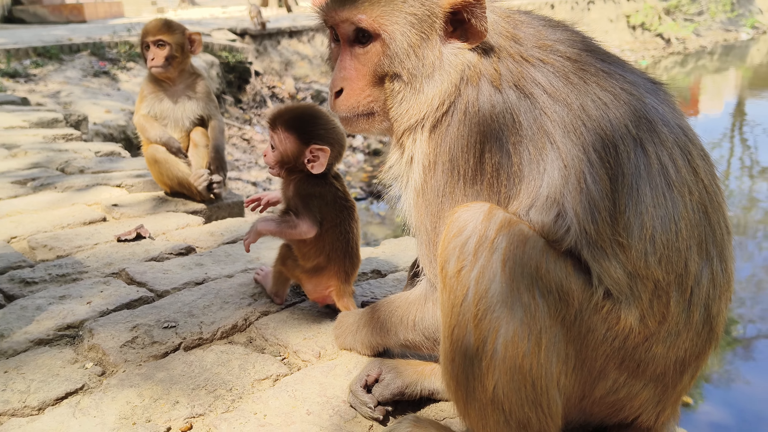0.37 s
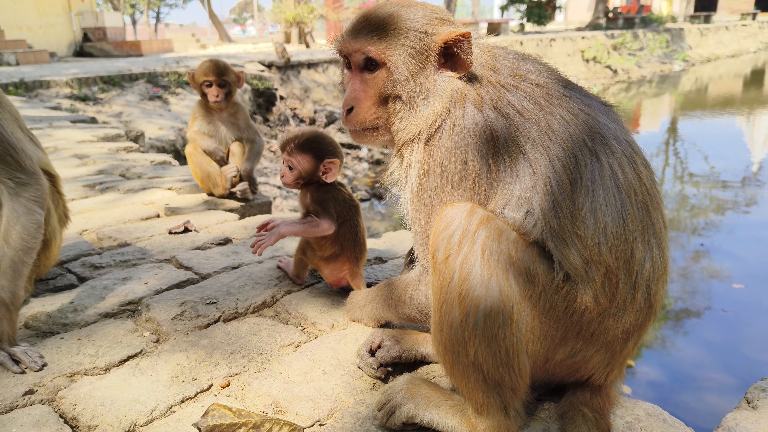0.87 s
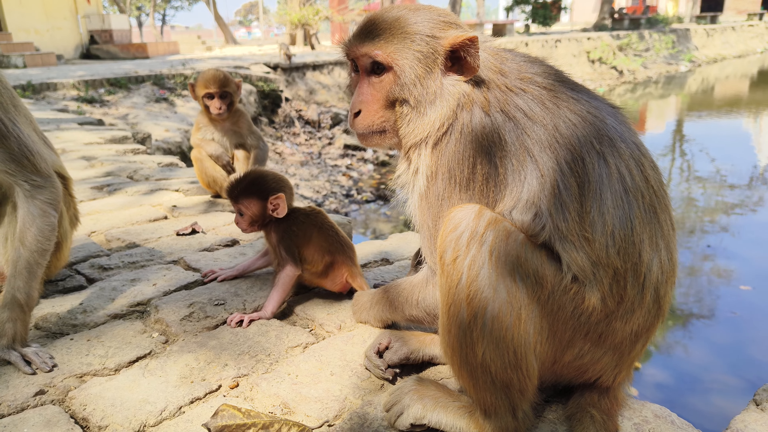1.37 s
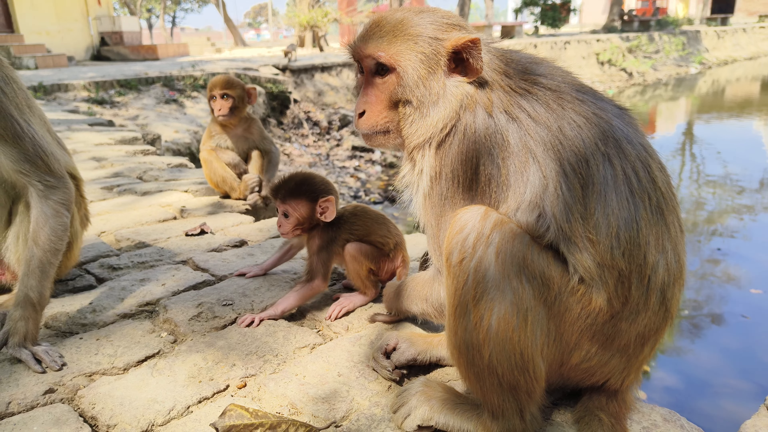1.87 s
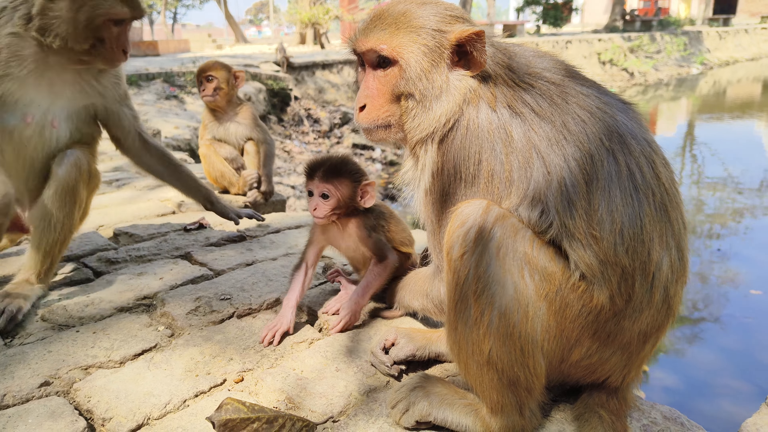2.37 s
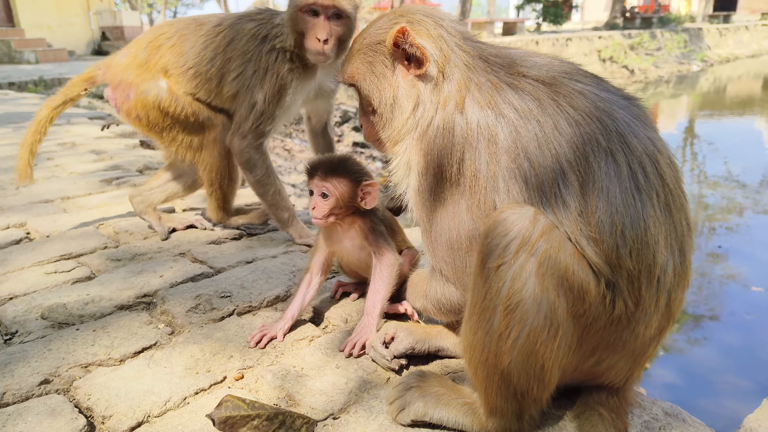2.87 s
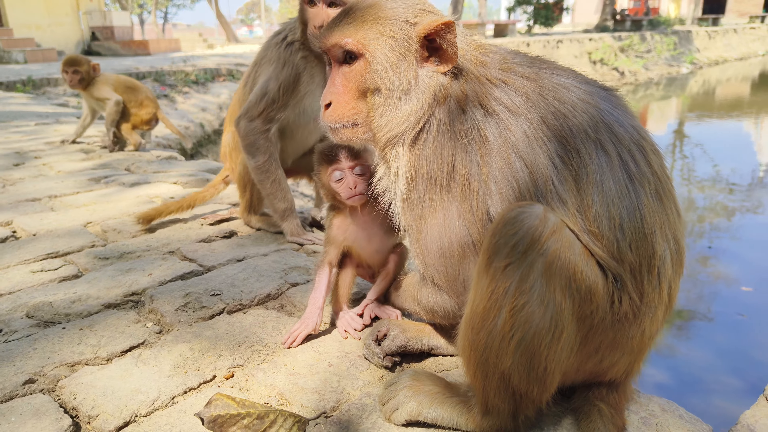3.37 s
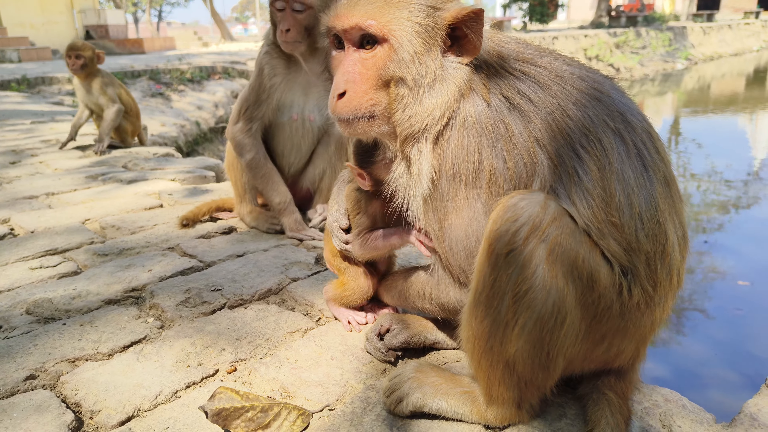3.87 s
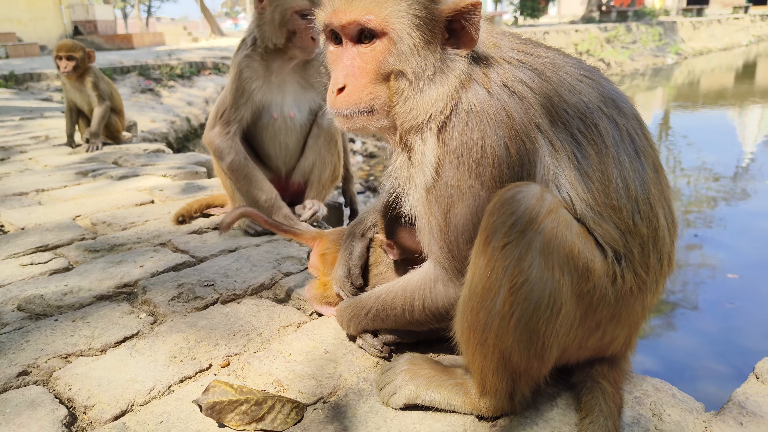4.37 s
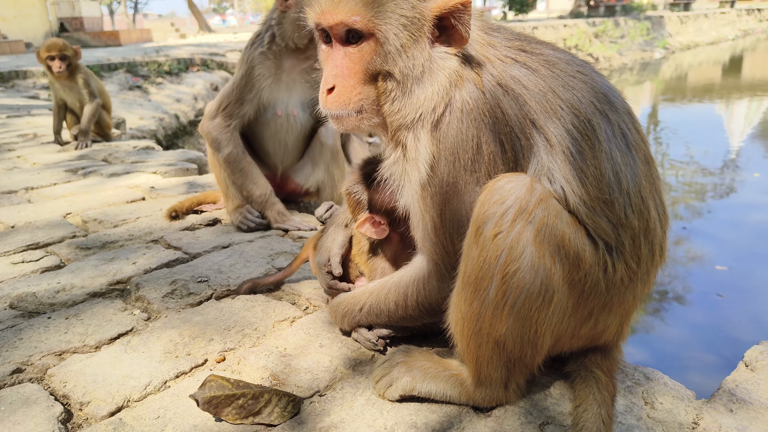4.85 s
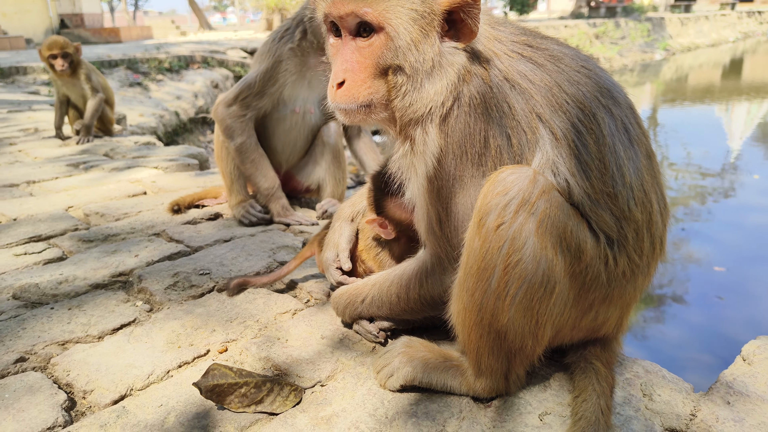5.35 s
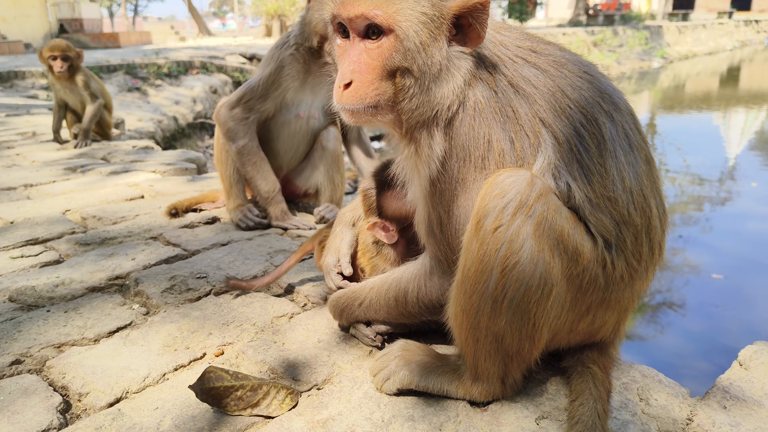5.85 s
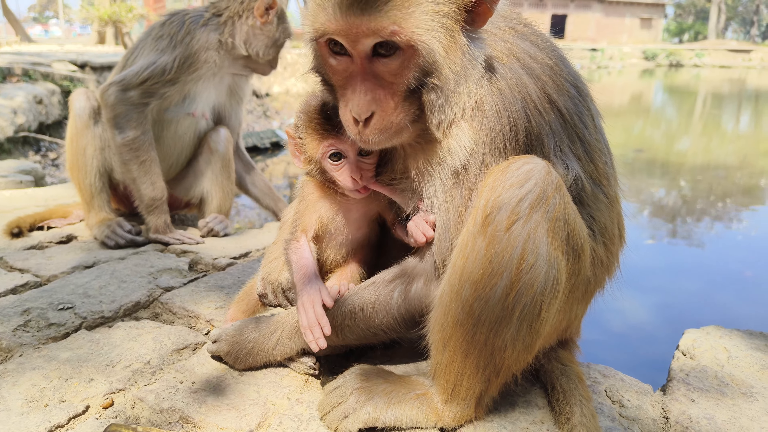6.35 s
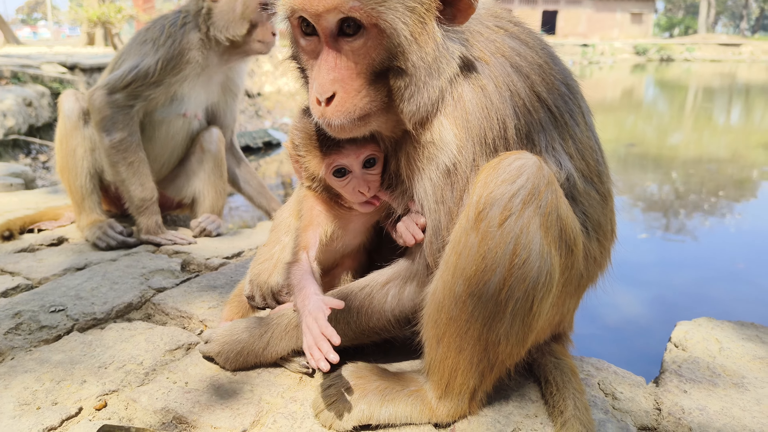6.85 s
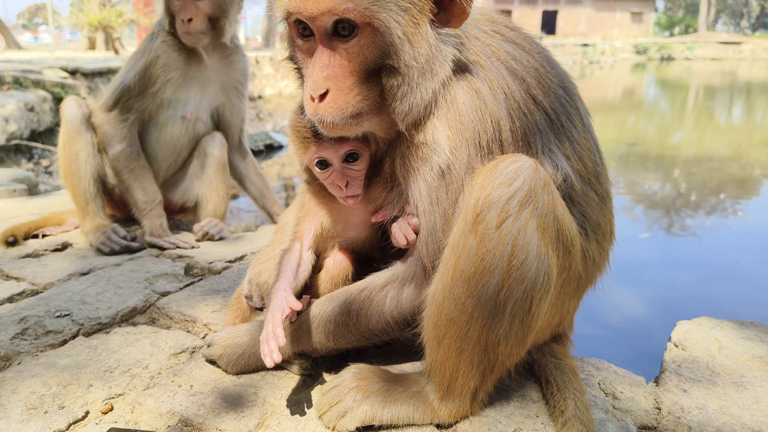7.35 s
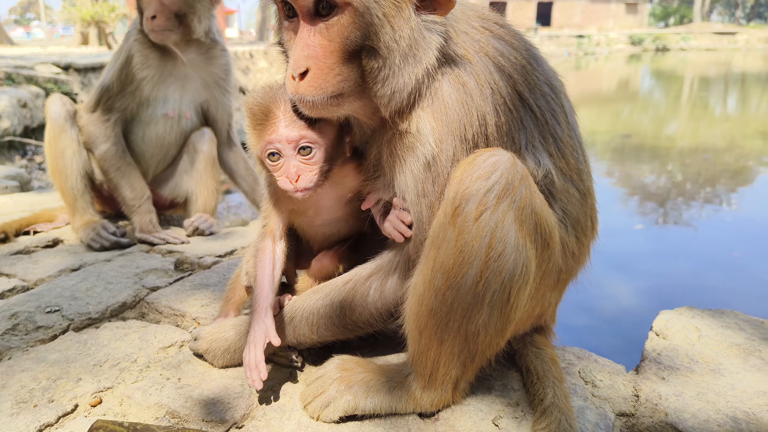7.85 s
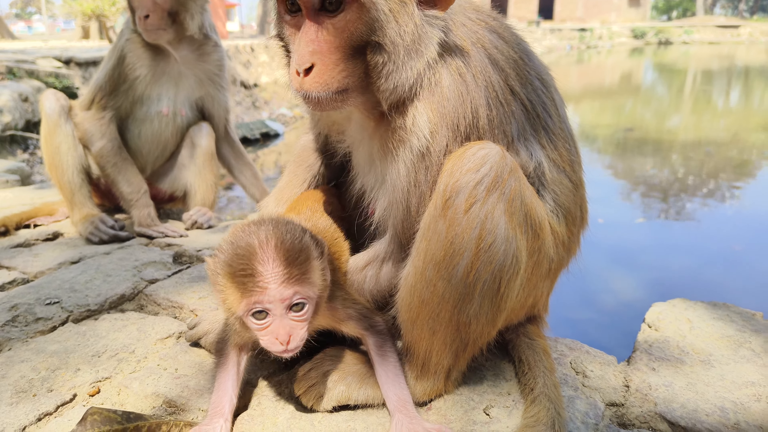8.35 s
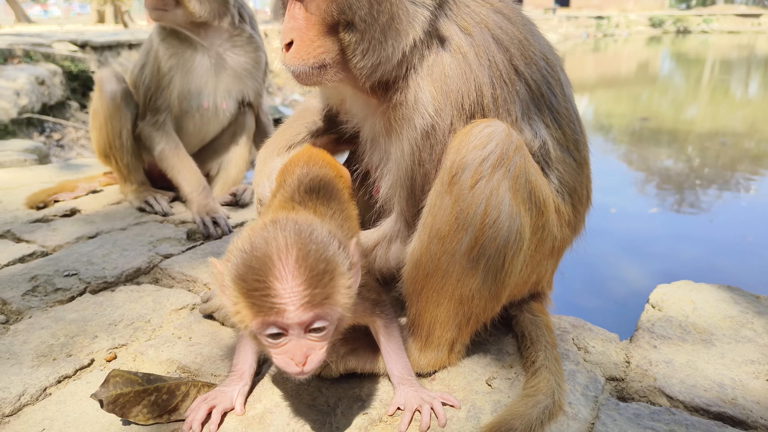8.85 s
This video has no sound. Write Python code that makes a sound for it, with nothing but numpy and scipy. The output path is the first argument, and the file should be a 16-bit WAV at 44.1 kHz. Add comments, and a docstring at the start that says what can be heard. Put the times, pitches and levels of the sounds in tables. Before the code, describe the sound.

Open air on a stone pond bank, macaques close to a two-port phone microphone, with a low uneven engine hum far off and faint hiss. From 0 to 2 s feet and fur scuff over gritty stone, with small knocks, while an infant gives a soft rising coo at about 0.5-1.1 s. Wind buffets the left side around 2.4-2.8 s; a leaf crackles and grit snaps at 2.7 s, then a sharper scuffle with snaps at 3.2 s. Short barks and a peep come at 3.6-3.8 s, with faint coos, whistles and chirps to 4.8 s. A rapid chirp cluster sounds at 5 s, a yap at 5.25 s and faint distant hoots. Two harsh, rasping squeals follow at 5.9-6.4 s and 6.7-7 s. Squeaks come at 7.3 s, warbles at 7.8 s, and a burst of squeaks with a strong wind thump near 8 s. Crisp snaps at 8.3 s and scuffs near 9 s finish it.

```python
"""Macaques by a pond

Macaques on a stone bank, a metre or two from a phone with two microphone ports. Infants squeal and coo
near and far, as stacks of gliding partials; the two long squeals also rasp with choking bands of noise.
Feet, fur and dry leaves are grains of noise; ticks and knocks are damped rings with a crack of noise.
Wind buffets the left port as low noise and slow eddies, over a low town rumble and a faint open-air hiss."""
import sys
import numpy as np
from scipy import signal
from scipy.fft import rfft, irfft
from scipy.io import wavfile
from scipy.ndimage import uniform_filter1d

SR = 44100
rng = np.random.default_rng(int(sys.argv[2]) if len(sys.argv) > 2 else 0)


def how_loud(loudness_db):
    """Turn decibels into a plain amplitude multiplier (0 dB gives 1, 20 dB gives 10)."""
    steps = np.asarray(loudness_db, float) / 20
    return 10 ** steps


def wav_out(sig):
    """Save sig, one row per channel (or a flat mono array), as 16-bit PCM at SR to the path in sys.argv[1]."""
    wavfile.write(sys.argv[1], SR, np.round(np.clip(np.atleast_2d(sig).T, -1, 1) * 32767).astype(np.int16))


N = 406602
T = np.arange(N) / SR
PORT_LAG_S = .00043  # the left port faces most sources
SWELL_POWER = 1.96  # 1 = pointed crest, 2 = round crest
SWELL_ENDS_DB = 27  # a scuff or rustle is this far down after its rise or fall time


def colour(x, points, lo_hz, hi_hz):
    """Shape to a spectrum joined on a log axis; rms 1 between lo and hi."""
    f = np.fft.rfftfreq(x.shape[-1], 1 / SR) + 1
    hz, db = np.transpose(points)
    spec = rfft(x) * how_loud(np.interp(np.log(f), np.log(hz), db))
    inside = (f > lo_hz) & (f < hi_hz)
    power = 2 * np.sum(np.abs(spec[..., inside]) ** 2) / x.shape[-1] / x.size
    return irfft(spec, x.shape[-1]) / np.sqrt(power)


def band(x, lo_hz, hi_hz):
    """Band-pass."""
    edges_hz = [lo_hz, min(hi_hz, .45 * SR)]
    return signal.sosfilt(signal.butter(2, edges_hz, "bandpass", fs=SR, output="sos"), x)


def walk(rate, size=N):
    """Smooth random wander, spread 1; a higher rate wanders faster."""
    k = max(int(SR / rate), 2)
    steps = rng.standard_normal(size + 2 * k)
    smooth = uniform_filter1d(uniform_filter1d(steps, k), k)
    return smooth[k:-k] * np.sqrt(1.5 * k)


def ports(shared, alike, lag_s=PORT_LAG_S, grain=1):
    """Two-port noise: a shared part that reaches the right port late, plus each port's own part."""
    alike = np.clip(alike, 0, 1)
    both = np.array([shared * grain, np.roll(shared * grain, int(lag_s * SR))])
    own = grain * rng.standard_normal((2, N))
    return np.sqrt(alike) * both + np.sqrt(1 - alike) * own


def pan(db):
    """Left and right gains for a left minus right difference in dB."""
    return how_loud(np.array([db / 2, -db / 2]))


def curve(tables, column, rest):
    """One column of several spans over time, resting between them."""
    out = np.full(N, float(rest))
    for rows in map(np.array, tables):
        on = (T >= rows[0, 0]) & (T <= rows[-1, 0])
        out[on] = np.interp(T[on], rows[:, 0], rows[:, column])
    return out


def swell(t, crest_s, rise_s, fall_s):
    """Rounded distance from the crest: 0 there, 1 after the rise or fall time; times dB, an envelope."""
    side_s = np.where(t < crest_s, max(rise_s, 1e-3), max(fall_s, 1e-3))
    return np.abs((t - crest_s) / side_s) ** SWELL_POWER


def swells(table, rest_db):
    """Level in dB of a table of swells together over a faint rest level."""
    power = how_loud(2 * rest_db)
    for crest_s, db, rise_s, fall_s in table:
        power = power + how_loud(2 * (db - SWELL_ENDS_DB * swell(T, crest_s, rise_s, fall_s)))
    return 10 * np.log10(power)


def blows(table, ring_cycles, crack_db, crack_s, spread):
    """Each blow: a damped ring and a short crack of noise around the ring's pitch."""
    out, t = np.zeros((2, N)), T[:4000]
    for s, db, hz, pan_db in table:
        ring = np.sin(2 * np.pi * hz * t) * np.exp(-t * hz / ring_cycles) * (1 - np.exp(-t * hz))
        crack = band(rng.standard_normal((2, len(t))), hz / spread, hz * spread)
        crack = crack * how_loud(crack_db) * np.exp(-t / crack_s)
        hit = (ring + crack) * how_loud(db) * pan(pan_db)[:, None]
        for side, lag in enumerate((0, int(.5 * PORT_LAG_S * SR))):
            a = int(s * SR) + lag
            out[side, a:a + len(t)] += hit[side, :N - a]
    return out


# wind on the left port, before its flutter: (t/s, level/dB around 40 Hz)
WIND_GUSTS = [(0.0, -72), (0.37, -87), (1.74, -75.5), (2.0, -62.5), (2.434, -53), (3.2, -66.5),
              (4.6, -76.5), (4.73, -59.5), (5.2, -73), (6.9, -77), (7.102, -67.5), (7.9, -58.5),
              (7.99, -46), (8.06, -64.5), (9.22, -66.5)]
# spectrum of the wind: (f/Hz, relative level/dB per Hz)
WIND_SPECTRUM = [(12, -22), (20, -10.5), (54, 9), (81, 7.5), (186, -19.5), (300, -36), (390, -32.5),
                 (660, -120)]
# single eddies slapping the left port, cresting 1.5 cycles after t: (t/s, strength/dB, f/Hz)
EDDIES = [(2.354, -22, 83.6), (2.599, -25, 59.6), (2.729, -33.5, 58.5), (2.803, -28.5, 101.5),
          (3.48, -38.5, 62.7), (3.625, -46, 79), (4.697, -37.5, 65), (4.745, -35, 60), (4.83, -41, 60.7),
          (7.133, -28, 61.7), (7.51, -25.5, 67.9), (7.948, -22.5, 105.7), (8.409, -33.5, 72),
          (8.882, -29, 57), (8.88, -27, 76)]


def wind():
    """Gusty low pressure, mostly on the left port, with single eddies as a few slow, lopsided cycles."""
    noise = colour(rng.standard_normal((2, N)), WIND_SPECTRUM, 35.1, 45.4)
    gust_db = np.interp(T, *np.transpose(WIND_GUSTS)) + 2.0 * walk(42)
    out = noise * how_loud(gust_db) * np.array([[1], [how_loud(-15.5)]])
    for s, db, hz in EDDIES:
        cycles = (T - s) * hz - 1.5
        overtone = 0.24 * np.cos(4.4 * np.pi * cycles) * np.exp(-(cycles / 1.0) ** 2)
        swing = np.cos(2 * np.pi * cycles) + overtone
        out += how_loud(db) * np.exp(-(cycles / .85) ** 2) * swing * np.array([[1], [how_loud(-36)]])
    return out


# resonances of far engines, before the lean to the left: (f/Hz, width/Hz, level/dB)
ENGINE_HUMS = [(72.2, 26.4, -61), (112.4, 13, -69.5)]


def town():
    """Far engines as narrow bands of noise: a low hum that throbs unevenly, nearly alike at both ports."""
    out = 0
    for hz, width_hz, db in ENGINE_HUMS:
        hum = band(ports(rng.standard_normal(N), 1.0), hz - width_hz / 2, hz + width_hz / 2)
        out = out + hum / hum.std() * how_loud(db)
    return out * pan(2.3)[:, None]


# spectrum of the open air: (f/Hz, relative level/dB per Hz)
AIR_SPECTRUM = [(120, -46), (200, -8.5), (456, -11), (601, 9), (1160, -33), (1300, 1.5), (2470, 9.5),
                (6880, 9), (8420, -5), (11500, -42), (15100, -16), (16000, -20)]
AIR_DB = -53.5  # 1-16 kHz, before the split into bands


def air():
    """Distant hiss in octave bands that each waver a little."""
    noise = colour(ports(rng.standard_normal(N), 0.34), AIR_SPECTRUM, 1000, 16000)
    lows_hz = 150 * 2. ** np.arange(7)
    return how_loud(AIR_DB) * sum(band(noise, lo, 2 * lo) * how_loud(1.1 * walk(9)) for lo in lows_hz)


# feet and fur dragged over stone close by: (loudest at t/s, treble level/dB, rise/s, fall/s)
DRAGS = [(.38, -50.5, 0.1, 0.052), (.52, -44.5, 0.22, 0.48), (.82, -62.5, 0.1, 0.36),
         (1.063, -56, 0.035, 0.048), (1.217, -58.5, 0.1, 0.07), (1.42, -50, 0.11, 0.17),
         (1.665, -49, 0.081, 0.053), (1.77, -60.5, 0.052, 0.16), (2.05, -50.5, 0.17, 0.2),
         (2.479, -59, 0.069, 0.15), (3.06, -62.5, 0.012, 0.29), (3.217, -42, 0.037, 0.034),
         (3.4, -59, 0.013, 0.16), (3.617, -55.5, 0.1, 0.18), (3.81, -60, .05, 0.16),
         (4.086, -58.5, 0.034, 0.084), (4.22, -60, 0.12, 0.26), (4.81, -53.5, 0.03, 0.042),
         (4.988, -52.5, 0.018, 0.12), (5.27, -53, 0.058, 0.063), (5.612, -53.5, 0.19, 0.25),
         (7.821, -54, 0.22, 0.28), (7.927, -57, 0.044, 0.032), (8.071, -59, 0.19, 0.096),
         (8.216, -54, 0.015, 0.025), (8.314, -43, 0.012, 0.044), (8.87, -49, 0.16, 0.17),
         (9.022, -44, 0.019, 0.044), (9.189, -51, 0.017, 0.021)]
SHUFFLE_DB = -67.5  # the faint shuffle between drags


def drag_level():
    """Level in dB of everything dragged over the stone, as rounded swells over a faint shuffle."""
    return swells(DRAGS, SHUFFLE_DB)


# spectrum of feet and fur on stone: (f/Hz, relative level/dB per Hz)
SCUFF_SPECTRUM = [(210, -29), (350, -21), (959, -12), (1090, -11.5), (2310, 0.5), (3500, -3), (5140, 2),
                  (8440, -3), (13600, -13.5), (16000, -7.5)]


def scuffs(db):
    """Dense grit grains of uneven size; a long drag fills out below, a quick slip is crisp on top."""
    size_db = np.minimum(14.0 * rng.exponential(1, N), 12)
    grain = how_loud(size_db) * (rng.random(N) < .15)
    noise = colour(ports(rng.standard_normal(N), 0.27, grain=grain), SCUFF_SPECTRUM, 6200, 19700)
    slip_db = db - uniform_filter1d(db, 8000)  # how far the level stands above its own slow average
    body, top = band(noise, 300, 3000), band(noise, 9000, 19000)
    tilt = (how_loud(-.3 * slip_db) - 1) * body + (how_loud(0.034 * slip_db) - 1) * top
    return (noise + tilt) * how_loud(db)


def crackle(db):
    """Stray grains of grit and dry leaf tick in the treble, more often while something is dragged."""
    busy = uniform_filter1d(how_loud(db / 2), 4000)
    chance = rng.random((2, N))
    struck = chance[0] < 30 / SR * busy / busy.mean()  # 30 a second on average
    hits = struck * how_loud(-56 + 12 * chance[1] ** 2)
    bursts = signal.lfilter([1], [1, -.97], hits) * rng.standard_normal((2, N))
    return band(bursts, 3200, 16500)


# grit and twigs snapping near the microphone: (t/s, strength/dB, ring f/Hz, left minus right level/dB)
SNAPS = [(0.1486, -39, 2740, 11), (0.756, -42, 1950, 20), (0.826, -36.5, 1990, 11), (1.0575, -46, 7840, 22),
         (1.7915, -48, 6600, 12), (2.6907, -26, 1970, 4), (2.6907, -30.5, 4550, 17.5),
         (2.743, -44, 7000, 12), (2.793, -36.5, 6000, 7), (2.825, -45, 5900, -6), (2.864, -42, 5200, -3),
         (3.0451, -37, 7350, -5), (3.088, -32.5, 4660, -6), (3.176, -35, 4970, 3), (3.2075, -24, 5280, -3),
         (3.2113, -23, 5260, 11), (3.224, -22, 5760, 0), (3.458, -30.5, 5020, 6), (3.4688, -42, 3920, -7),
         (3.538, -37.5, 5360, 2), (4.858, -40, 3000, 0), (4.6946, -30.5, 7560, 6), (6.746, -37, 2680, 5.5),
         (7.913, -37.5, 6700, 27), (8.3105, -26, 4860, 1), (8.3128, -19, 5140, 0), (8.3205, -23.5, 4270, 2),
         (9.0227, -32, 4690, 17.5), (9.1845, -44.5, 6800, 23)]


def ticks():
    """Grit and twigs snap: a high ring of several cycles with a brief, quieter crack."""
    return blows(SNAPS, ring_cycles=9, crack_db=-6, crack_s=.0022, spread=3.5)


# pebbles and paws knocking on the bank: (t/s, strength/dB, ring f/Hz, left minus right level/dB)
STONE_KNOCKS = [(0.2274, -57, 2700, 17), (0.375, -45.5, 487, 10), (.616, -48, 1040, 10),
                (1.0799, -47.5, 1710, 2), (3.826, -55, 270, 7), (4.061, -40.5, 532, 8),
                (4.548, -49, 820, 11), (4.6458, -47, 2170, -4), (5.14, -48.5, 142, -15),
                (6.57, -47, 175, 1), (6.635, -53.5, 488.3, -3), (7.34, -54, 640, -13),
                (7.999, -54.5, 295, 11)]


def knocks():
    """Pebbles and paws knock: a quickly damped ring under a longer, stronger crack."""
    return blows(STONE_KNOCKS, ring_cycles=4, crack_db=5, crack_s=.006, spread=2.2)


ARCH_POWER = .65  # under 1 = quick rise, long plateau, quick drop


def note(start_s, length_s, from_hz, to_hz, db, order, rough, fall_db, arch, crest, ends_db):
    """A stack of partials that glides and arches; roughness shakes pitch and loudness till lines smear."""
    n, k, rough, crest = int(length_s * SR), order, np.clip(rough, 0, 1), np.clip(crest, 0, 1)
    u = np.arange(n) / n
    glide_hz = from_hz * (to_hz / from_hz) ** u
    hz = glide_hz * (1 + arch * length_s * np.sin(np.pi * u) ** ARCH_POWER)
    # the vocal folds waver slowly and jitter quickly
    slow = walk(36.3, size=n)
    waver = 1 + rough * (0.032 * (slow - slow.mean()) + 0.0576 * walk(254, size=n))
    phase = 2 * np.pi * np.cumsum(hz / k * waver) / SR
    call = 0
    for j in range(1, int(15500 * k / hz.max()) + 1):
        flutter = 1.0 * walk(500, size=n) + rough * 0.053 * walk(2500, size=n)
        shake = np.sqrt(1 - rough) + np.sqrt(rough) * flutter
        # partials above both the loudest one and 5 kHz lose a further 4.2 dB per kHz
        above_khz = max(j * hz.min() / k / 1000 - max(hz.min() / 1000, 5), 0)
        throat_db = -abs(fall_db * (j - k)) - 4.2 * above_khz
        call = call + how_loud(throat_db) * shake * np.sin(j * phase)
    broken_db = 3 * rough * walk(70, size=n)
    effort_db = db - ends_db * swell(u, crest, crest, 1 - crest)
    return call * np.sqrt(2) * how_loud(effort_db + broken_db) * signal.windows.tukey(n, min(1, 200 / n))


STONES_DB, STONES_T60_S = -4, .028  # scatter off nearby stones and bodies, and its decay by 60 dB
STONES_HZ = 2500  # notes below this scatter less


def scatter(call, hz):
    """The direct sound plus a quick spray of reflections, unlike at each port, weaker for low notes."""
    t = T[:int(STONES_T60_S * SR)]
    paths = rng.standard_normal((2, len(t))) * how_loud(-60 * t / STONES_T60_S)
    spray = how_loud(STONES_DB) * min(hz / STONES_HZ, 1) ** 2
    paths *= spray / np.linalg.norm(paths, axis=1, keepdims=True)
    paths[:, 0] = 1
    heard = signal.fftconvolve(call[None], paths)
    return heard * np.linalg.norm(call) / np.linalg.norm(heard, axis=1, keepdims=True)


# kinds of call, by name: order of the loudest partial, roughness 0-1, fall level/dB per partial away
# from it, echo level/dB, pitch arch (share per s of length), crest (share of the note at which it is
# loudest), ends level/dB down
CALL_KINDS = dict( coo=dict(order=1, rough=.03, fall_db=32, echo_db=-28, arch=.25, crest=.68, ends_db=13),
              far_coo=dict(order=1, rough=.08, fall_db=30, echo_db=-15, arch=.2, crest=.72, ends_db=14),
              hoot=dict(order=1, rough=.2, fall_db=25, echo_db=-15, arch=.02, crest=.45, ends_db=9),
              peep=dict(order=1, rough=.16, fall_db=4, echo_db=-9, arch=.05, crest=.3, ends_db=14),
              squeak=dict(order=2, rough=.17, fall_db=3, echo_db=-17, arch=-.3, crest=.2, ends_db=12),
              chirp=dict(order=1, rough=.3, fall_db=30, echo_db=-11, arch=.05, crest=.3, ends_db=14),
              bark=dict(order=1, rough=.55, fall_db=14, echo_db=-14, arch=.05, crest=.25, ends_db=12),
              yap=dict(order=1, rough=.55, fall_db=10, echo_db=-24, arch=-.05, crest=.45, ends_db=12),
              squeal=dict(order=4, rough=.35, fall_db=4.8, echo_db=-22, arch=-.15, crest=.3, ends_db=9),
              screech=dict(order=3, rough=.3, fall_db=20, echo_db=-24, arch=.05, crest=.55, ends_db=14),
              twitter=dict(order=5, rough=.15, fall_db=4.9, echo_db=-8, arch=.1, crest=.45, ends_db=10),
              swoop=dict(order=1, rough=.32, fall_db=4, echo_db=-15, arch=-.7, crest=.5, ends_db=6),
              warble=dict(order=1, rough=.3, fall_db=15, echo_db=-14, arch=.1, crest=.7, ends_db=9),
              whistle=dict(order=1, rough=.14, fall_db=30, echo_db=-10, arch=0, crest=.15, ends_db=14))
# notes of each kind, level before panning:
# (start t/s, length/s, loudest partial's f/Hz at start, f/Hz at end, level/dB)
CALLS = dict( coo=[(.47, .605, 857, 925, -52.5)], far_coo=[(3.585, 0.31, 964, 1035, -61.5),
         (4.23, 0.317, 955, 1140, -60)], hoot=[(5.07, .13, 640.3, 628, -72.5), (5.28, .22, 642, 636, -76.5),
         (5.55, 0.38, 644.5, 614, -72), (5.7, 0.15, 1110, 1093, -65)],
         peep=[(3.755, 0.14, 2397, 2420, -53)], squeak=[(7.32, 0.062, 5080, 4510, -48.5)],
         chirp=[(4.295, 0.076, 2120, 2090, -53), (4.338, 0.017, 2470, 2520, -45),
         (4.977, 0.011, 3120, 3200, -39.5), (4.99, 0.018, 3110, 3120, -38), (5.002, 0.014, 3097, 2786, -35),
         (5.033, 0.017, 3004, 3125, -34.5), (5.048, 0.015, 3155, 3090, -42),
         (5.062, 0.019, 3020, 2920, -52), (7.435, 0.1, 3524, 3050, -57), (8.125, 0.05, 2165, 1474, -50),
         (8.1, 0.027, 5300, 4904, -44), (8.133, 0.039, 5600, 4870, -41), (8.52, 0.054, 3480, 3170, -53.5),
         (8.59, 0.035, 3260, 3170, -53.5)], bark=[(3.555, 0.04, 3260, 3500, -49),
         (3.617, 0.031, 3704, 3590, -35.5), (3.652, 0.055, 3610, 3520, -49.5),
         (3.615, 0.034, 4175, 4180, -42), (3.628, 0.021, 2840, 2920, -45), (3.635, 0.026, 1630, 1550, -56),
         (3.795, 0.047, 1460, 1420, -56), (3.064, .04, 3750, 3300, -50), (3.066, 0.11, 2180, 2290, -59.5),
         (4.265, 0.053, 2588, 2435, -43.5), (4.275, .025, 3000, 3093, -50),
         (4.785, 0.058, 3087, 2530, -42.5), (4.81, 0.038, 1647, 1520, -53),
         (8.085, 0.079, 7170, 5860, -44.5), (8.105, 0.075, 2800, 2528, -40.5)],
         yap=[(5.25, 0.0605, 3000, 3320, -37), (5.235, 0.065, 4100, 3910, -42.5),
         (6.79, 0.039, 4300, 4180, -40), (6.79, .03, 5050, 5134, -47), (6.868, 0.049, 3800, 4050, -35),
         (6.935, 0.0407, 4040, 3750, -35)], squeal=[(5.905, 0.11, 7000, 6280, -48.5),
         (6.075, 0.032, 6720, 6800, -49.5), (6.135, 0.053, 6920, 6600, -55),
         (8.054, 0.036, 12220, 12960, -49)], screech=[(6.135, 0.043, 3960, 4100, -44),
         (6.195, 0.028, 3850, 3900, -41), (6.31, 0.055, 4295, 4170, -47), (6.368, 0.037, 4190, 4140, -37.5),
         (6.0, 0.032, 5205, 4700, -51), (6.02, 0.039, 4800, 5200, -52), (6.065, 0.02, 4600, 5200, -58)],
         whistle=[(4.01, .065, 2204, 2310, -57), (4.65, 0.074, 2400, 2540, -62),
         (5.08, 0.19, 2900, 3070, -58), (5.275, 0.18, 3370, 3300, -51.5), (7.325, 0.068, 3590, 3470, -53),
         (7.325, .05, 6000, 5800, -57)], warble=[(7.735, .075, 1900, 2260, -48),
         (7.765, .075, 2500, 2640, -51), (7.795, .095, 1320, 1916, -57.5), (7.825, .11, 2030, 2426, -43.5)],
         twitter=[(7.222, .045, 5230, 5400, -55)], swoop=[(8.072, 0.063, 4010, 2390, -41)])
# where each kind's caller sits: left minus right level/dB
CALLER_PLACES = dict(coo=-2.5, far_coo=1, hoot=6, peep=-3, squeak=2, chirp=-4.5, bark=2, yap=-4, squeal=3, screech=-3, twitter=3, swoop=2, warble=-4, whistle=-4)
# each kind's lag of the right port behind the left/s; kinds not listed use PORT_LAG_S
CALLER_LAGS = dict(coo=0, far_coo=.00029, squeak=.00005, swoop=.00004, bark=.00016, yap=.00012, screech=.00018, warble=.00025)
ECHO_T60_S = 0.52


def voices():
    """Every note at the two ports from where its caller sits; walls send a decaying, dulled echo."""
    dry, wet = np.zeros((2, N)), np.zeros(N)
    for name, rows in CALLS.items():
        kind = dict(CALL_KINDS[name])
        pan_db, echo_db = CALLER_PLACES[name], kind.pop("echo_db")
        lag = int(CALLER_LAGS.get(name, PORT_LAG_S) * SR)
        for row in rows:
            call, a = note(*row, **kind), int(row[0] * SR)
            left, right = scatter(call, row[2]) * pan(pan_db)[:, None]
            dry[0, a:a + len(left)] += left
            dry[1, a + lag:a + lag + len(right)] += right
            wet[a:a + len(call)] += call * how_loud(echo_db)
    t = T[:SR]
    tail = rng.standard_normal((2, SR)) * how_loud(-60 * t / ECHO_T60_S) * (t > .012)
    tail = band(tail, 820, 5300)  # distance dulls the echo
    tail /= np.sqrt(np.sum(tail[0] ** 2))
    return dry + signal.fftconvolve(wet[None], tail)[:, :N]


# dry leaves brushed close by, before the lean to the left: (loudest at t/s, level/dB, rise/s, fall/s)
LEAF_BRUSHES = [(.89, -56, .02, 0.022), (2.72, -37.5, 0.0069, 0.042), (2.83, -57.5, 0.055, 0.074),
                (3.215, -36.5, 0.063, 0.025), (3.36, -53.5, 0.011, 0.026), (3.465, -45.5, 0.016, 0.014),
                (6.6, -60, 0.024, 0.076), (7.917, -53, .012, .01), (7.936, -45, 0.0086, 0.0096),
                (8.216, -44, 0.053, 0.046), (8.33, -63, .01, 0.017), (8.362, -56, .008, 0.007),
                (8.44, -58.5, 0.0094, 0.023)]
# spectrum of the leaves: (f/Hz, relative level/dB per Hz)
LEAF_SPECTRUM = [(1500, -18.5), (3500, -7), (5200, 2.5), (7000, 2.5), (10000, -3.5), (14000, 2.5),
                 (16000, -3)]


def rustles():
    """Brushed dry leaves as sparse, crisp grains with hardly any body."""
    size_db = np.minimum(4.0 * rng.exponential(1, N), 18)
    grain = how_loud(size_db) * (rng.random(N) < .05)
    shared = rng.standard_normal(N)
    noise = colour(ports(shared, 0.5, lag_s=.00019, grain=grain), LEAF_SPECTRUM, 3000, 9400)
    return noise * how_loud(swells(LEAF_BRUSHES, -99)) * pan(4.8)[:, None]


# air rasping through the throat in the two long squeals, one span each, before choking: (t/s, level/dB)
THROAT_RASPS = [
    [(5.87, -54.5), (5.946, -45.5), (6.11, -39), (6.14, -42.5), (6.374, -41.5), (6.43, -56)],
    [(6.64, -58), (6.7, -44.5), (6.888, -41.5), (6.955, -48), (7.0, -62)],
]
# spectrum of the rasp: (f/Hz, relative level/dB per Hz)
RASP_SPECTRUM = [(710, -59.5), (1200, -67), (1870, -10.5), (2700, -8), (3250, -36), (3650, 5), (4950, 12),
                 (5700, 5), (6500, 8.5), (7600, 5.5), (16000, 0)]


def rasps():
    """Turbulent air in the squealing infant's throat: narrow bands that each swell and choke alone."""
    grain = how_loud(1.57 * walk(310))
    shared = rng.standard_normal(N)
    noise = colour(ports(shared, 0.19, lag_s=0.00015, grain=grain), RASP_SPECTRUM, 7850, 18700)
    lows_hz = np.arange(1500, 17000, 700)
    ragged = sum(band(noise, lo, lo + 700) * how_loud(2.1 * walk(50)) for lo in lows_hz)
    level_db = uniform_filter1d(curve(THROAT_RASPS, 1, -89), 300)
    return ragged * how_loud(level_db)


def scene():
    """All sources at the two ports."""
    drag_db = drag_level()
    background = wind() + town() + air()
    bank = scuffs(drag_db) + crackle(drag_db) + ticks() + knocks() + rustles()
    return background + bank + voices() + rasps()


def top_cut(x):
    """Nothing passes above the cut-off."""
    return signal.sosfilt(signal.butter(12, 16850, fs=SR, output="sos"), x)


TOP_HZ = 15900


def record(dry):
    """The phone trims the top with a steep low-pass."""
    trimmed = signal.sosfilt(signal.ellip(8, .2, 40, TOP_HZ, fs=SR, output="sos"), dry)
    return top_cut(trimmed)


dry = scene()
out = record(dry)
wav_out(out)
```